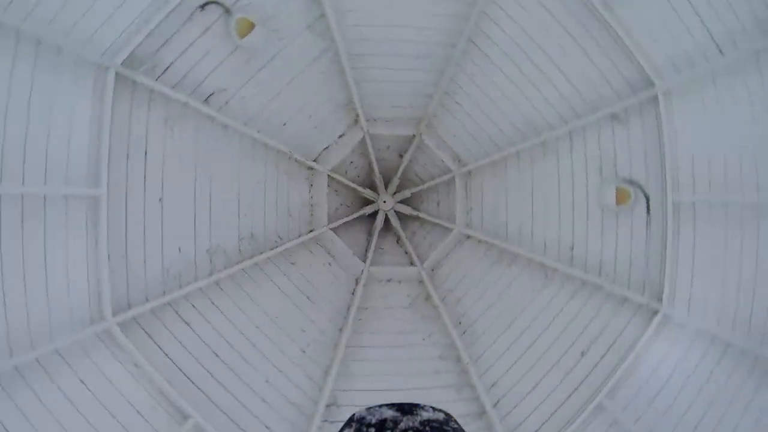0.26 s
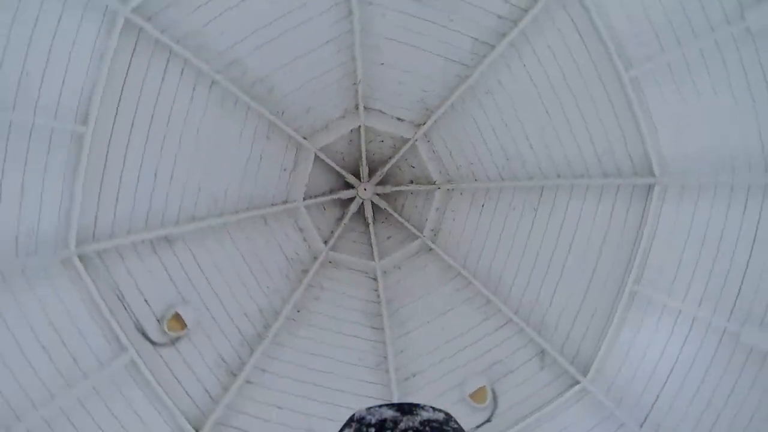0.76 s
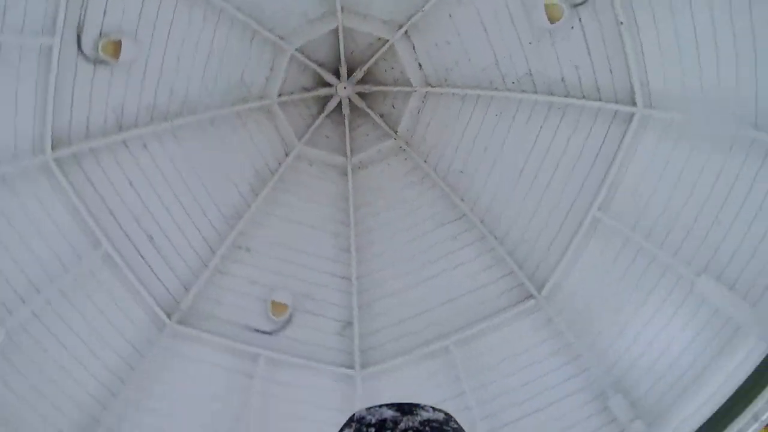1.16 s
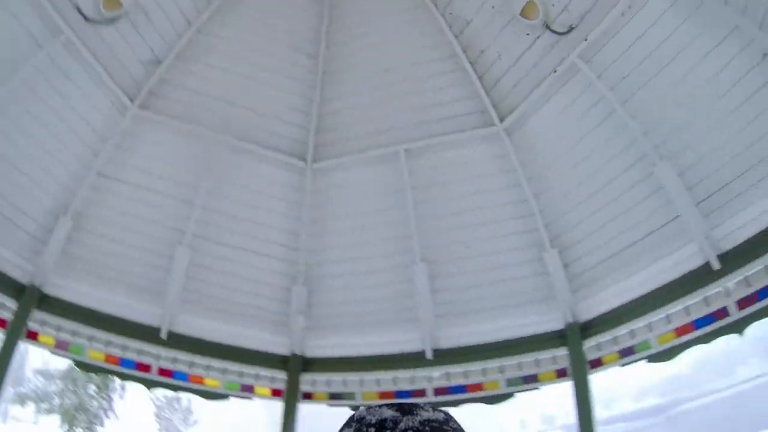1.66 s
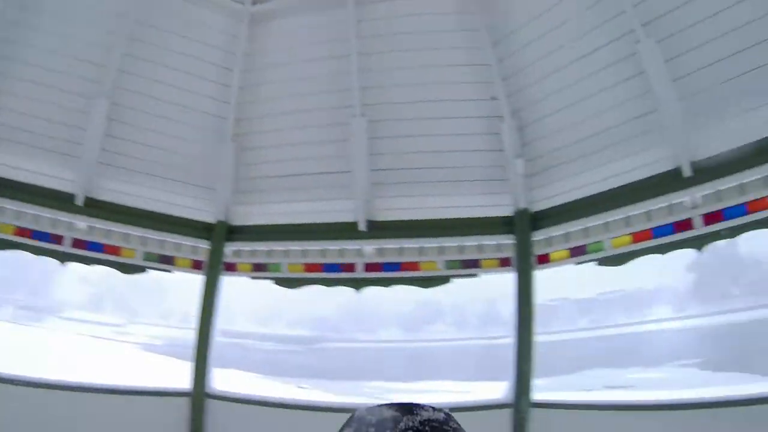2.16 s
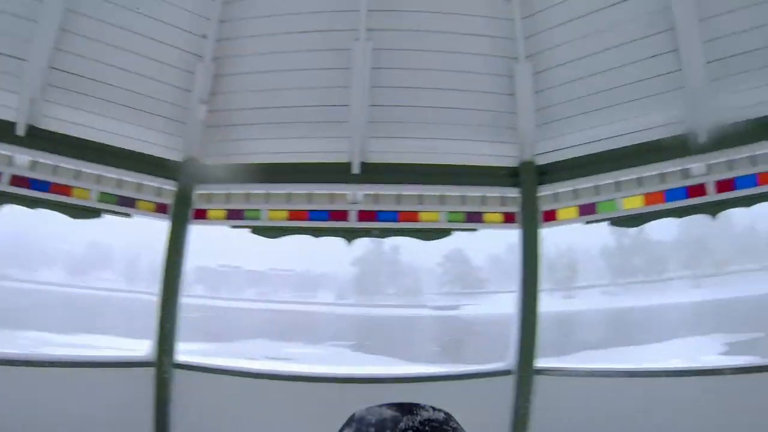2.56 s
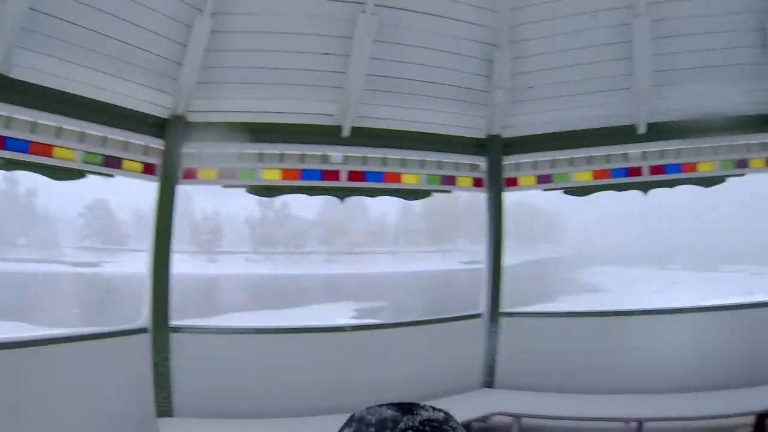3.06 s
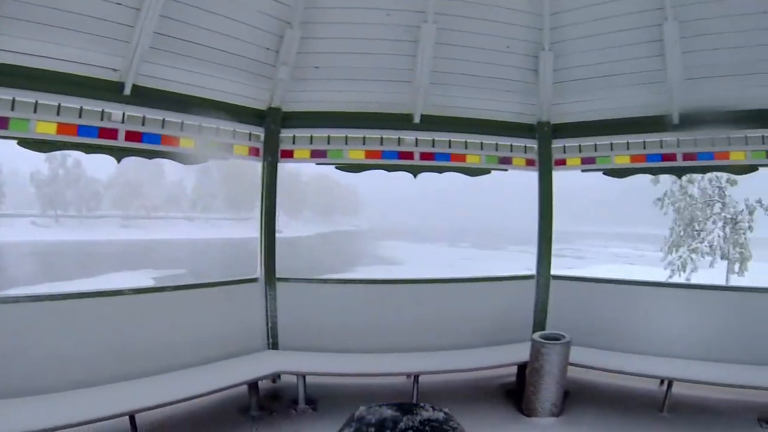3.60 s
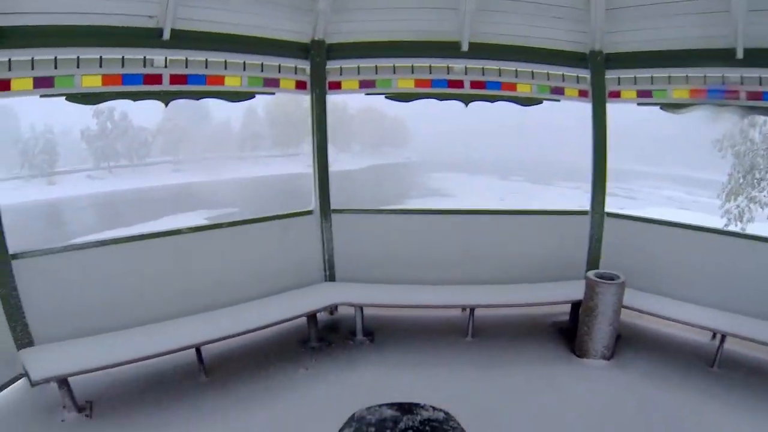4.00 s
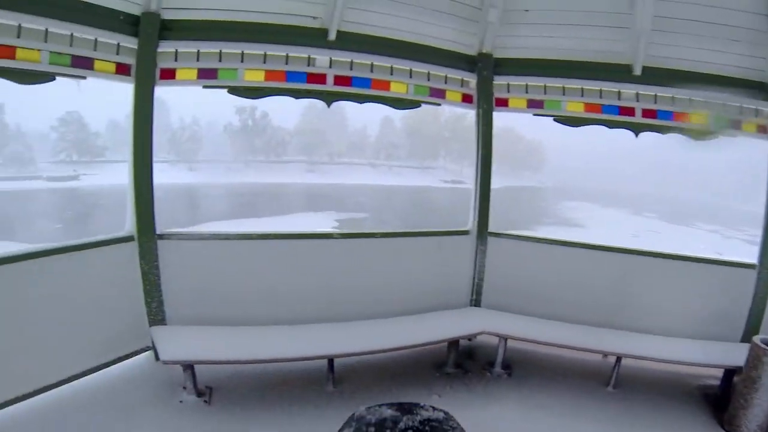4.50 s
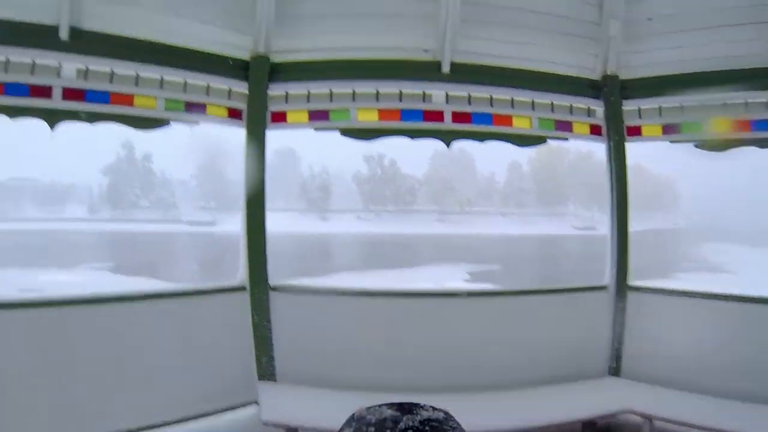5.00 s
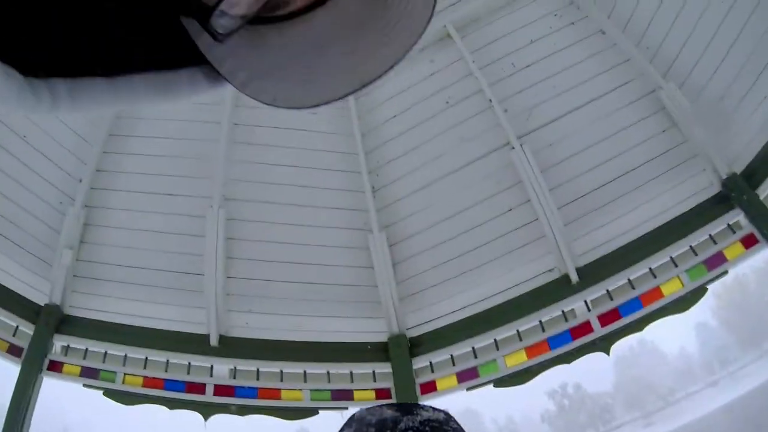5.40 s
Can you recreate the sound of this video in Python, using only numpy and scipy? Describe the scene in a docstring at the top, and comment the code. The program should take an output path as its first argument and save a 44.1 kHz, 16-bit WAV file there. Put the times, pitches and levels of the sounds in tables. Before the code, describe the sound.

Close, on-body microphone in winter wind: bassy rumble and throbbing pole hum over thin, steady hiss. Knocks open the scene, it quiets, then soft thumps return from about two seconds. A busy cluster of clacks, hollow thuds and rubs comes near four seconds; after a lull, bright hard clicks and a low boom arrive just past five. Faint electronic buzzing flickers in the second half.

```python
"""A long pole carrying a small camera is swung about under a park shelter in a snowstorm. It hums at its lowest
bending mode, driven by gusts and jolts, and its joints knock: short contacts ring groups of resonances.
Wind buffets the microphone port as low-frequency noise; a glove rubs, as dense grains ringing the same bodies.
Ice ticks on the housing, the camera's electronics buzz faintly in paired pulses, and a noise floor hisses."""
import sys
import numpy as np
from scipy import signal
from scipy.io import wavfile
from scipy.ndimage import uniform_filter1d

SR = 44100
rng = np.random.default_rng(int(sys.argv[2]) if len(sys.argv) > 2 else 0)


def to_wav(s):
    """Save 16-bit WAV."""
    ch = np.atleast_2d(s).T  # columns
    pcm = np.round(np.clip(ch, -1, 1) * 32767)  # PCM
    wavfile.write(sys.argv[1], SR, pcm.astype(np.int16))


N = 249165

# Far storm and preamp noise, relative spectral density: f/Hz, level/dB per Hz
HISS_SPECTRUM = [(290, -19), (500, -7.5), (1100, -10.5), (1310, -12), (1530, -11), (1880, -12),
                 (2500, -12.5), (2720, -13), (7240, -22), (9110, -22.5), (12100, -22.5), (14200, -38.5),
                 (15500, -37)]
HISS_DB = -62  # rms

# Bursts of the electronic buzz: start t/s, length/s
BUZZ_BURSTS = [(1.945, .012), (2.114, .036), (2.281, .036), (2.517, .036), (2.737, .036), (2.955, .036),
               (3.243, .036), (3.347, .036), (3.579, .044), (3.731, .036), (3.946, .036), (4.241, .036),
               (4.378, .036), (4.654, .036), (4.786, .036), (5.014, .036), (5.218, .180)]
# Resonances that colour the buzz: f/Hz, bandwidth/Hz, level/dB
BUZZ_MODES = [(4950, 500, -5), (7450, 1100, 0), (9600, 1400, 0), (11800, 1000, -2), (13200, 1400, -3)]
BUZZ_CYCLE_S, BUZZ_SECOND_S = 0.008, 0.0034  # two pulses a cycle, unevenly spaced
BUZZ_DB = -50  # peak of each pulse

# Grains of ice striking the housing: t/s, peak level/dB, decay of the contact noise/ms
ICE_TICKS = [(0.1126, -46, 1.3), (0.177, -47, 1.7), (0.289, -60, 3.4), (0.332, -34.5, 2.1),
             (0.3535, -29, 6), (0.375, -54, 2.8), (0.383, -44, 2.8), (0.4453, -55, 1.4), (0.6639, -53, 2.0),
             (1.6817, -50, 2.3), (2.1999, -32, 3.2), (5.2839, -42, 1.1), (5.2895, -22, 1.8),
             (5.293, -27, 5), (5.5135, -36.5, 0.63)]
# Resonances rung by the ice: f/Hz, bandwidth/Hz, level/dB
ICE_MODES = [(3140, 2450, -7.5), (5400, 1130, -4), (7220, 600, -7), (9700, 470, -10.5),
             (13300, 11000, -21.5)]

# Knocks in the pole's joints, as peak levels before filtering:
# t/s, housing level/dB, low thud level/dB, hollow thud level/dB, crack level/dB, decay of the contact noise/ms
JOINT_KNOCKS = [(0.0524, -28.5, -41, -29, -43.5, 9.4), (0.072, -11, -35.5, -29.5, -59, 2.55),
                (.262, -23.5, -33, -27.5, -44.5, 3.2), (0.264, -34.5, -31.5, -38, -51, 13.6),
                (1.363, -60, -45, -41.5, -68, 2.8), (1.621, -42.5, -45, -57, -56, 5.1),
                (1.79, -54, -37.5, -49, -66, 5.8), (2.422, -29, -31.5, -33, -43, 6.6),
                (2.549, -49, -42.5, -46.5, -53, 4.1), (3.0054, -26.5, -25.5, -29, -46.5, 7),
                (3.6947, -30.5, -47, -50, -48, 3.1), (3.7214, -50, -36, -46, -48, 1.3),
                (3.7472, -27, -31.5, -46, -54, 3), (3.8188, -15, -42, -32, -56, 2.6),
                (4.001, -8, -26.5, -26, -34.5, 4.9), (4.0444, -50, -40, -35, -33, 2),
                (4.0739, -16.5, -36, -31, -34, 8.9), (4.097, -10.5, -7.5, -6, -29.5, 3.4),
                (4.149, -29.5, -29, -30, -48, 11), (4.193, -23, -43, -41, -29.5, 15.8),
                (4.212, -28, -42, -40.5, -45, 11), (4.4236, -41, -41.5, -55, -44, 7.4),
                (4.909, -35.5, -28.5, -31, -59, 4.4), (4.9389, -23, -27.5, -24.5, -37, 1.6),
                (5.0175, -37, -47, -45, -66, 6.6), (5.187, -31.5, -47, -53, -30, 0.94),
                (5.282, 1, -18, -25.5, -14, 1.5), (5.285, -17, -27.5, -32, -15.5, 8.7),
                (5.2941, 3.5, -24.5, -20, -28, 1.73), (5.3551, -25, -43, -54, -58, 2),
                (5.478, -26.5, -55, -47, -38.5, 10.8), (5.496, -36.5, -42, -50, -51, 21),
                (5.5119, -35, -38, -36, -61, 1.7), (5.6434, -26, -23, -38, -40, 11)]
# Resonances of the housing: f/Hz, bandwidth/Hz, level/dB
HOUSING_MODES = [(1444, 292, 9.5)]
# Cavity in front of the microphone: f/Hz, bandwidth/Hz, level/dB
PORT_MODES = [(1278, 590, -1.5)]
# Clamp between camera and pole: f/Hz, bandwidth/Hz, level/dB
MOUNT_MODES = [(975, 208, 3.5), (2020, 396, -6.5)]
# Second bending modes of the pole: f/Hz, bandwidth/Hz, level/dB
THUD_MODES = [(88, 56, 1.5), (151, 39, 4)]
# Air and walls of the tube: f/Hz, bandwidth/Hz, level/dB
HOLLOW_MODES = [(257, 71, 5.5), (418, 66, 5)]
# Treble resonances of the joints: f/Hz, bandwidth/Hz, level/dB
CRACK_MODES = [(2354, 144, 8), (2913, 190, 11), (3880, 300, -3.5), (4900, 600, -11), (6200, 670, -21.5)]
# Clamp relative to housing after a 1 ms contact; longer contacts shake it more
MOUNT_DB, MOUNT_DB_PER_DOUBLING = -26, 6.0

# Strength of the wind, as buffeting at the port: t/s, level/dB
WIND_LEVEL = [(0, -35), (.4, -40), (.9, -40), (1.25, -40), (1.55, -35), (1.85, -35), (2.05, -45),
              (2.5, -40), (3.0, -43), (3.25, -46), (3.65, -42), (3.95, -34), (4.25, -44), (4.7, -49),
              (4.95, -45), (5.25, -33), (5.45, -37), (5.65, -37)]
CALM_DB = -44  # buffeting level at which the hum, eddy and rustle levels below hold
# Faster eddies, relative spectral density: f/Hz, level/dB per Hz
EDDY_SPECTRUM = [(58, 1), (72, 4), (85, -9), (120, 5), (190, -4.5), (400, -8.5), (600, -17), (1000, -32.5)]
EDDY_DB, EDDY_FOLLOWS = -60, 0.36  # level; dB gained per dB of buffeting
RUSTLE_DB, RUSTLE_FOLLOWS = -64.5, 0.3  # steady rustle on the housing; dB gained per dB of wind

# Strokes of the glove: start t/s, length/s, level at start/dB, change over the stroke/dB
GLOVE_STROKES = [(0.697, 0.14, -59, -15), (3.664, 0.072, -61, 15.5), (3.773, 0.13, -41, 1),
                 (3.965, .15, -49.5, 8.5), (4.127, .05, -51.5, -8), (4.405, 0.034, -57, -3.5),
                 (4.925, .07, -56, 0), (5.018, 0.18, -50.5, -8), (5.184, 0.067, -53.5, 3.5),
                 (5.303, .07, -47.5, -9), (5.518, 0.17, -52.5, 2.5)]
STROKE_RISE_DB_PER_S, STROKE_FALL_DB_PER_S = 700, 689
STROKE_RUMBLE_DB = -2  # low shudder that a stroke sends down the pole, relative to the stroke
RUSTLE_FLICKER_DB, STROKE_FLICKER_DB = 1, 3.0  # spread of the slow unevenness

# Jolts of the pole: t of fullest swing/s, hum level/dB, fading/dB per s
# (it fades slowly when the pole swings free, fast in a firm grip)
POLE_JOLTS = [(0.078, -21.5, 175), (0.328, -26.5, 229), (.64, -37, 150), (1.098, -35.5, 185),
              (1.3, -42, 119), (1.65, -35, 200), (1.818, -21.5, 264), (2.04, -37.5, 200), (2.458, -25, 200),
              (2.589, -30, 90), (3.048, -23.5, 117), (3.758, -29.5, 101), (3.99, -22.5, 40.2),
              (4.118, -14.5, 67.7), (4.93, -30.5, 154), (5.038, -24, 51), (5.318, -18, 88),
              (5.558, -25, 150)]
JOLT_RISE_DB_PER_S = 306
# A jolt also pushes air at the port: this level plus a share of its hum dB
JOLT_BUFFET_DB, JOLT_BUFFET_FOLLOWS, BUFFET_FADE_DB_PER_S = -20.5, 0.34, 241
HUM_DB, HUM_FOLLOWS = -48, 1.3  # hum that the wind alone keeps up; dB gained per dB of wind
POLE_HZ, POLE_WANDER = 54.6, 0.025  # lowest bending mode; spread of its frequency as a fraction

BASS_CUT_HZ, CUTOFF_HZ = 18, 15700


def from_db(db):
    """An amplitude ratio is 10 to the power of its level in dB over 20."""
    return 10 ** (np.asarray(db) / 20)


def joined(*dbs):
    """Incoherent sources: their powers add, not their levels."""
    return 10 * np.log10(sum(10 ** (db / 10) for db in dbs))


def rms_one(x):
    """Normalization to unit rms."""
    return x / np.sqrt(np.mean(x ** 2) + 1e-20)


def in_time(rows):
    """Linear interpolation: the columns of a curve table, one value per sample."""
    s, *columns = np.transpose(rows)
    return [np.interp(np.arange(N) / SR, s, c) for c in columns]


def drift(rate):
    """Slow random fluctuation: noise through two equal one-pole low-passes with corner `rate` in Hz; spread 1."""
    step = 40  # samples between computed values
    r = np.exp(-2 * np.pi * rate * step / SR)
    noise = rng.standard_normal(N // step + 2002)
    slow = signal.lfilter([1], [1, -2 * r, r * r], noise)[2000:]  # settled part
    return np.interp(np.arange(N) / step, np.arange(len(slow)), rms_one(slow))


def resonate(x, modes):
    """Modal superposition: two-pole resonances in parallel, with alternating signs."""
    out = 0
    for k, (hz, width, db) in enumerate(modes):
        r = np.exp(-np.pi * width / SR)
        a = [1, -2 * r * np.cos(2 * np.pi * hz / SR), r * r]
        b = [(1 - r * r) / 2, 0, (r * r - 1) / 2]
        out = out + (-1) ** k * from_db(db) * signal.lfilter(b, a, x + 1e-18)
    return out


def coloured(spectrum, patchy_db, rate):
    """Band-filtered noise: roughly third-octave bands flicker separately and together; rms 1."""
    hz, db = np.transpose(spectrum)
    edge_count = round(3 * np.log2(hz[-1] / hz[0]))
    edges = np.geomspace(hz[0], min(hz[-1], 0.45 * SR), edge_count)
    white = rng.standard_normal((2, N))  # neighbouring bands use different noise
    together = drift(rate)
    out = 0
    for k, (low, high) in enumerate(zip(edges, edges[1:])):
        sos = signal.butter(2, [low, high], "band", fs=SR, output="sos")
        band = signal.sosfilt(sos, white[k % 2])
        level = np.interp(np.log(low * high) / 2, np.log(hz), db)
        flicker = 0.6 * together + drift(rate)
        out = out + band * from_db(level + patchy_db * flicker)
    return rms_one(out)


def contacts(times, peaks_db, lengths_ms, modes, touch):
    """Impact excitation: a sharp first touch and a dying rattle of noise ring the modes, each set to its peak."""
    size = 3000
    t_ms = np.arange(size) / SR * 1000
    decay = np.exp(-(t_ms / np.maximum(lengths_ms, 0.1)[:, None]) ** 2)
    rattle = rng.standard_normal((len(times), size)) * decay
    rattle[:, 0] += touch
    rings = resonate(rattle, modes)
    out = np.zeros(N + size)
    for s, db, ring in zip(times, peaks_db, rings):
        out[round(s * SR):][:size] += from_db(db) * ring / np.max(np.abs(ring))
    return out[:N]


def swells(starts, lengths, dbs, change_db, rise_db_per_s, fall_db_per_s):
    """Exponential growth and decay, straight in dB: events rise, hold while changing evenly, fade; powers add."""
    t = np.arange(0, N + 64, 64) / SR
    columns = (starts, lengths, dbs, change_db, fall_db_per_s)
    starts, lengths, dbs, change, fall = (np.reshape(v, (-1, 1)) for v in columns)
    held = np.clip(t - starts, 0, lengths)
    before = np.maximum(starts - t, 0)
    after = np.maximum(t - starts - held, 0)
    db = dbs + change * held / (lengths + 1e-9) - rise_db_per_s * before - fall * after
    total_db = 10 * np.log10(np.sum(10 ** (db / 10), axis=0) + 1e-20)
    return np.interp(np.arange(N) / SR, t, total_db)


def hiss():
    """Broadband noise: the far storm and the preamp form a nearly steady floor."""
    return from_db(HISS_DB) * coloured(HISS_SPECTRUM, patchy_db=0.3, rate=8.0)


def buzz():
    """Periodic excitation: pairs of short noisy pulses repeat while each burst lasts."""
    times = []
    for start, length in BUZZ_BURSTS:
        for k in range(int(length / BUZZ_CYCLE_S) + 1):
            first = start + k * BUZZ_CYCLE_S
            times += [first, first + BUZZ_SECOND_S]
    count = len(times)
    return contacts(times, np.full(count, BUZZ_DB), np.full(count, 1.5), BUZZ_MODES, touch=0.1)


def ticks():
    """Impact of light grains: brief contact noise rings broad treble resonances."""
    s, db, ms = np.transpose(ICE_TICKS)
    return contacts(s, db, ms, ICE_MODES, touch=0.5)


def rubbing(rustle_db, stroke_db):
    """Friction as dense uneven grains that ring the housing, the mount, the tube and the joints."""
    sizes = from_db(2.2 * np.minimum(rng.exponential(1, N), 5)) * rng.choice([-1, 1], N)
    grains = sizes * (rng.random(N) < 2500 / SR)  # 2500 grains per s on average
    rings = resonate(resonate(grains, HOUSING_MODES), PORT_MODES)
    rings = rings + from_db(-11.5) * resonate(grains, MOUNT_MODES)
    rings = rings + from_db(-8) * resonate(grains, HOLLOW_MODES)
    rings = rings + from_db(-13.5) * resonate(grains, CRACK_MODES[:3])
    rings = rings + from_db(-12) * resonate(grains, CRACK_MODES[3:])
    flicker = drift(22.0)
    uneven_rustle_db = rustle_db + RUSTLE_FLICKER_DB * flicker
    uneven_stroke_db = stroke_db + STROKE_FLICKER_DB * flicker
    return from_db(joined(uneven_rustle_db, uneven_stroke_db)) * rms_one(rings)


def wind(buffet_db, turbulence_db):
    """Turbulent pressure: slow swings at the port follow the gust, with faster low-frequency noise above them."""
    sos = signal.butter(3, [12, 33], "band", fs=SR, output="sos")
    swings = signal.sosfilt(sos, rng.standard_normal(N))
    swings = swings / np.sqrt(uniform_filter1d(swings ** 2, size=5000))  # even out their strength
    buffeting = from_db(buffet_db + 4.4 * drift(6.5)) * swings
    turbulence = from_db(turbulence_db) * coloured(EDDY_SPECTRUM, patchy_db=3.0, rate=33.0)
    return buffeting + turbulence


def pole(hum_db):
    """Lowest bending mode: a nearly pure tone when strong, jolted in lumps by eddies when weak."""
    phase = np.cumsum(2 * np.pi * POLE_HZ * (1 + POLE_WANDER * drift(5.51)) / SR)
    unrest = np.clip((-24 - hum_db) / 16, 0.1, 1)
    lumps = drift(11.0) * np.sin(phase) + drift(11.0) * np.cos(phase)
    hum = (np.sin(phase) + 0.6 * unrest * lumps) / np.sqrt(1 + unrest ** 2)
    return np.sqrt(2) * from_db(hum_db) * hum


def knocks():
    """Modal response to impact: each knock rings housing and mount, shakes pole and tube, cracks in the treble."""
    s, ring_db, thud_db, hollow_db, crack_db, ms = np.transpose(JOINT_KNOCKS)
    mount_db = ring_db + MOUNT_DB + MOUNT_DB_PER_DOUBLING * np.log2(np.maximum(ms, 0.1))
    ring = resonate(contacts(s, ring_db, ms, HOUSING_MODES, touch=5.7), PORT_MODES)
    mount = contacts(s, mount_db, ms, MOUNT_MODES, touch=7.1)
    thud = contacts(s, thud_db, ms, THUD_MODES, touch=14.2)
    hollow = contacts(s, hollow_db, ms, HOLLOW_MODES, touch=23.0)
    crack = contacts(s, crack_db, ms, CRACK_MODES, touch=10.5)
    soft = signal.butter(3, 560, fs=SR, output="sos")  # the pole passes little treble
    dull = signal.butter(2, 2600, fs=SR, output="sos")
    return signal.sosfilt(dull, ring + mount) + crack + signal.sosfilt(soft, thud + hollow)


def scene():
    """Superposition: wind, jolts and strokes set the levels, and all sources add at one microphone."""
    gust_db, = in_time(WIND_LEVEL)
    above_calm_db = gust_db - CALM_DB
    rustle_db = RUSTLE_DB + RUSTLE_FOLLOWS * above_calm_db
    stroke_db = swells(*np.transpose(GLOVE_STROKES), STROKE_RISE_DB_PER_S, STROKE_FALL_DB_PER_S)

    s, jolt_db, fade = np.transpose(POLE_JOLTS)
    jolt_hum_db = swells(s, 0, jolt_db, 0, JOLT_RISE_DB_PER_S, fade)
    hum_db = joined(HUM_DB + HUM_FOLLOWS * above_calm_db, jolt_hum_db)

    push_db = JOLT_BUFFET_DB + JOLT_BUFFET_FOLLOWS * jolt_db
    jolt_buffet_db = swells(s, 0, push_db, 0, JOLT_RISE_DB_PER_S, BUFFET_FADE_DB_PER_S)
    buffet_db = joined(gust_db, jolt_buffet_db)

    eddy_db = EDDY_DB + EDDY_FOLLOWS * (buffet_db - CALM_DB)
    turbulence_db = joined(eddy_db, stroke_db + STROKE_RUMBLE_DB)
    background = hiss() + buzz() + ticks()
    handling = rubbing(rustle_db, stroke_db) + pole(hum_db) + knocks()
    return (background + wind(buffet_db, turbulence_db) + handling)[None]


def record(dry):
    """Band limitation: the microphone loses the deepest bass, and the top is cut steeply."""
    thin = signal.sosfilt(signal.butter(2, BASS_CUT_HZ, "high", fs=SR, output="sos"), dry)
    return signal.sosfilt(signal.cheby2(12, 70, CUTOFF_HZ, fs=SR, output="sos"), thin)


dry = scene()
out = record(dry)
to_wav(out)
```